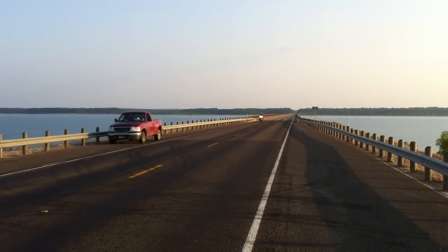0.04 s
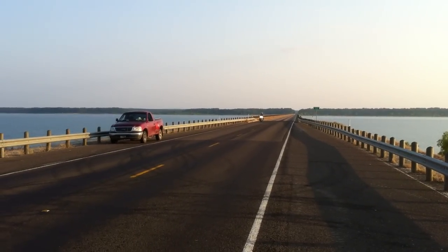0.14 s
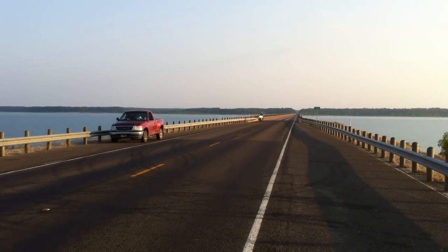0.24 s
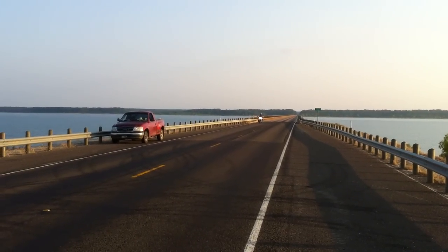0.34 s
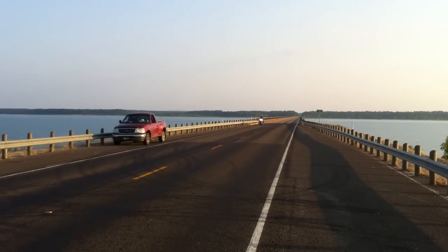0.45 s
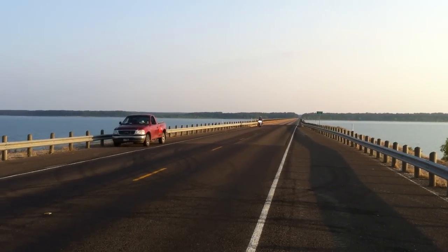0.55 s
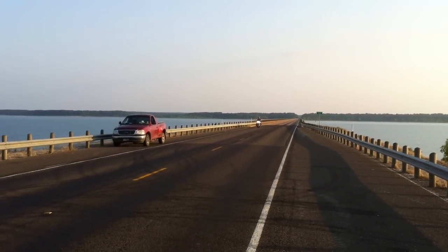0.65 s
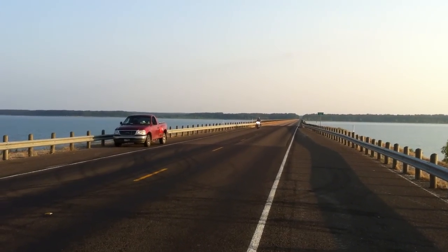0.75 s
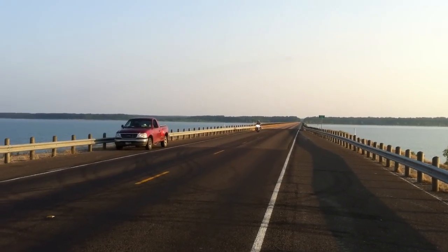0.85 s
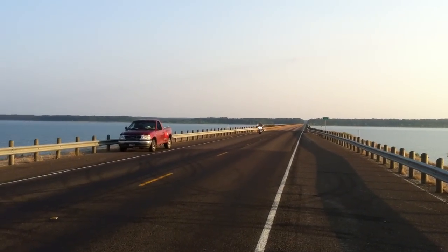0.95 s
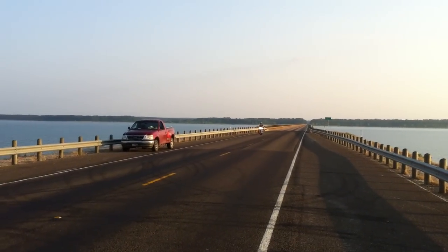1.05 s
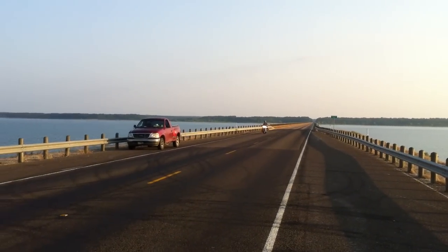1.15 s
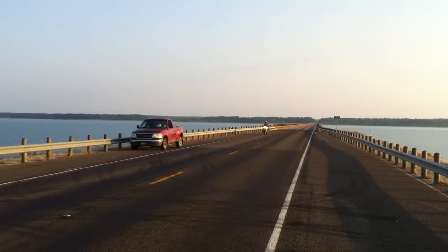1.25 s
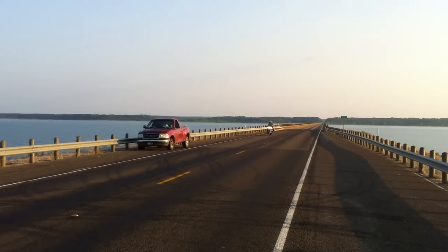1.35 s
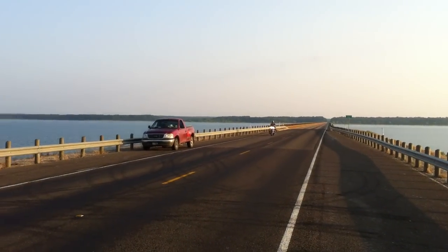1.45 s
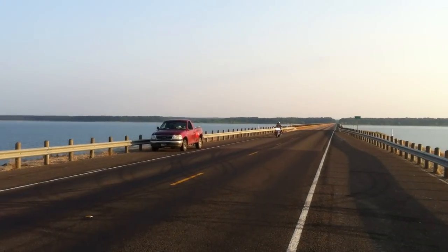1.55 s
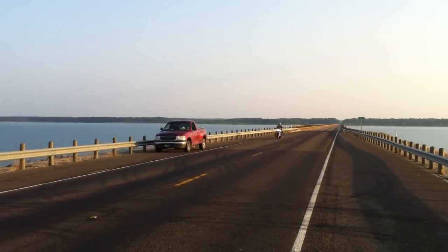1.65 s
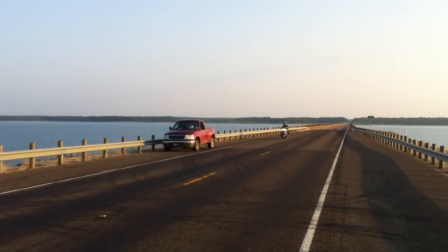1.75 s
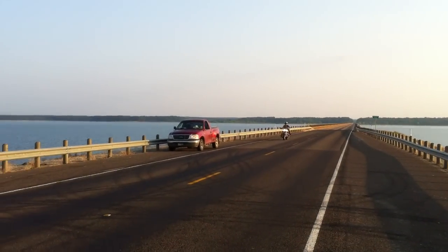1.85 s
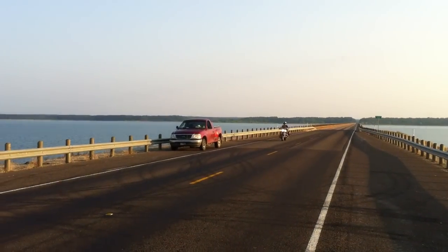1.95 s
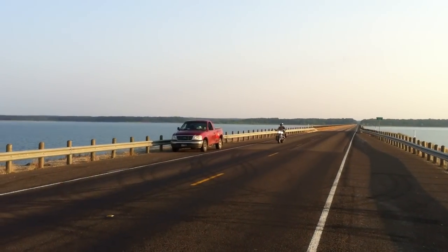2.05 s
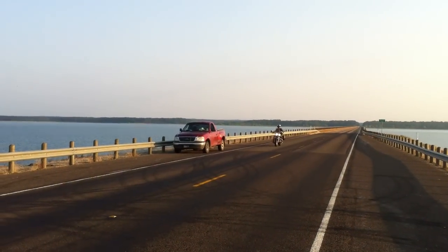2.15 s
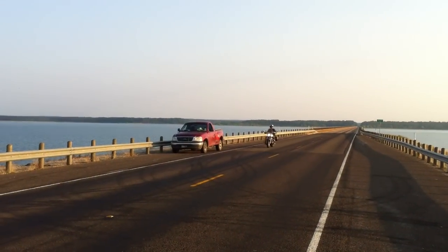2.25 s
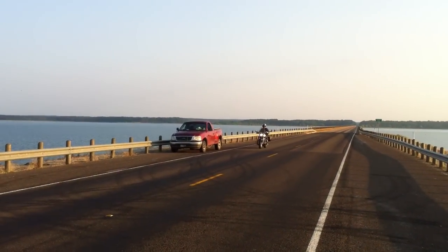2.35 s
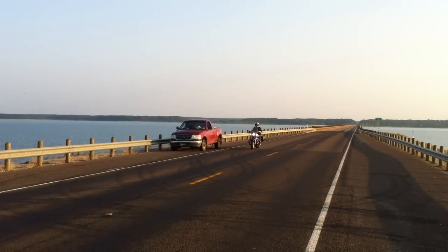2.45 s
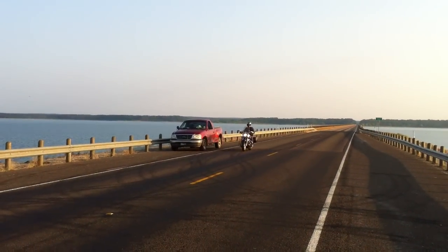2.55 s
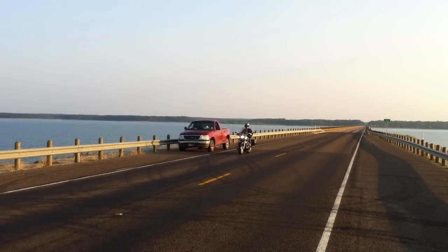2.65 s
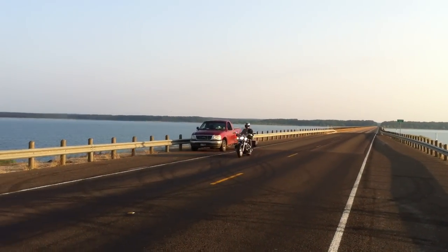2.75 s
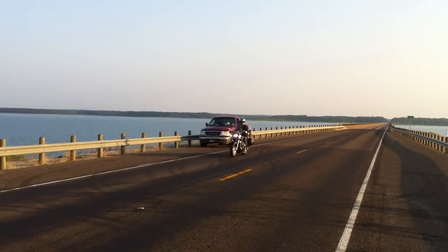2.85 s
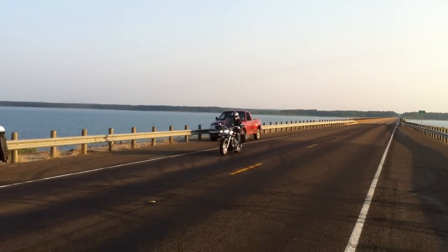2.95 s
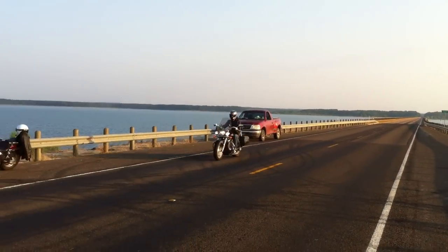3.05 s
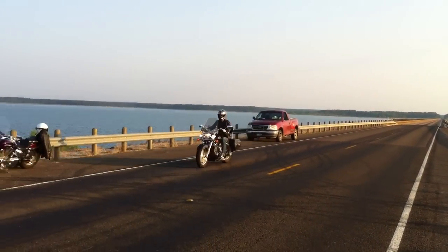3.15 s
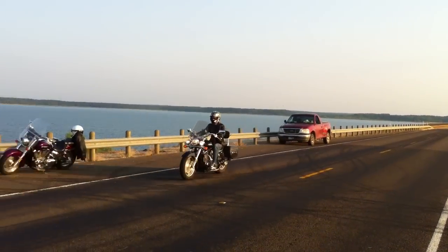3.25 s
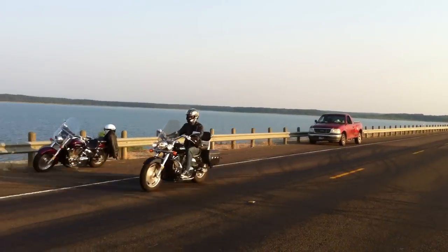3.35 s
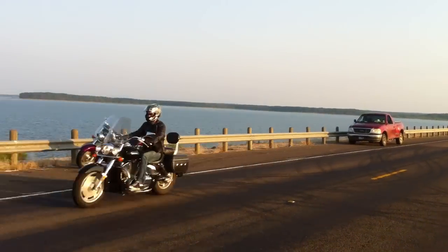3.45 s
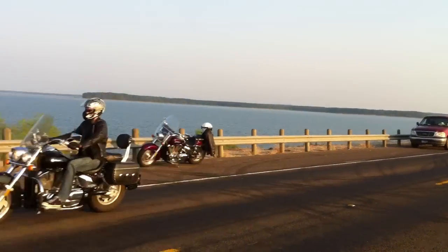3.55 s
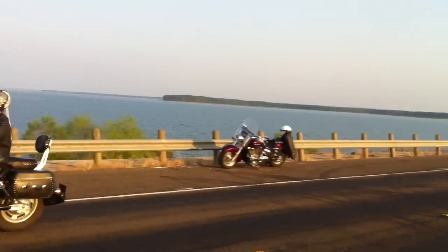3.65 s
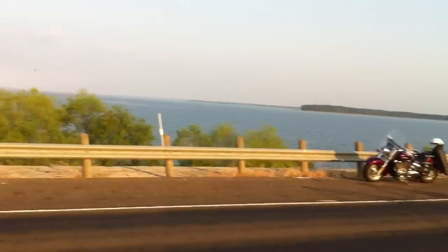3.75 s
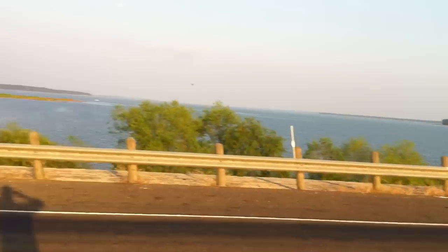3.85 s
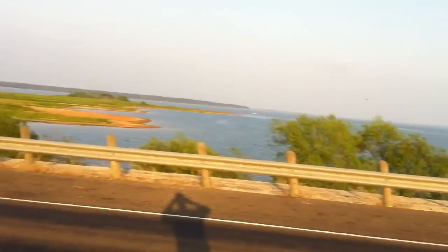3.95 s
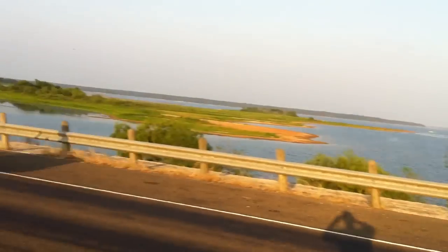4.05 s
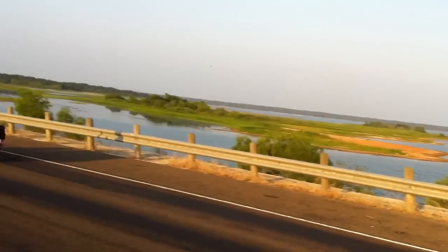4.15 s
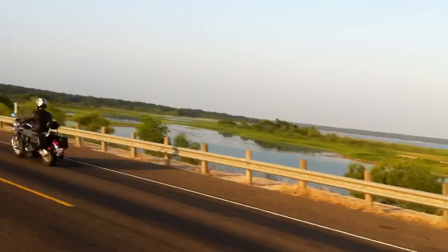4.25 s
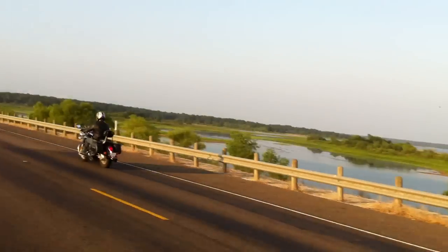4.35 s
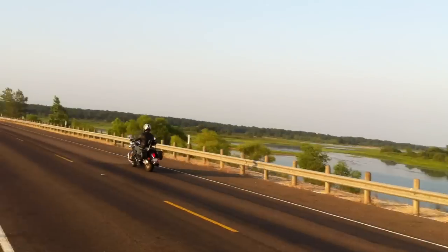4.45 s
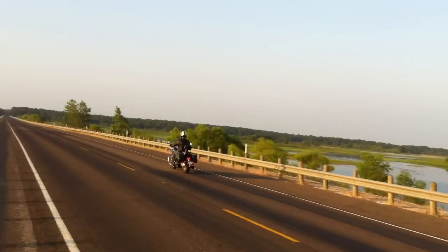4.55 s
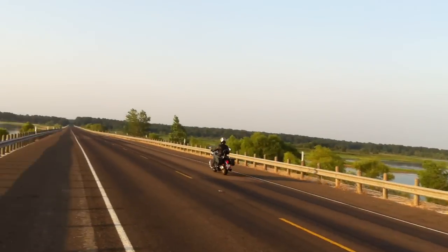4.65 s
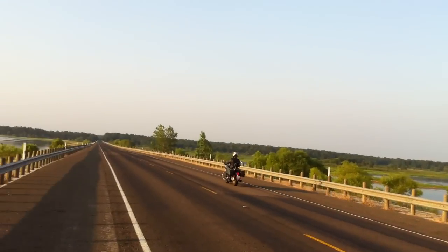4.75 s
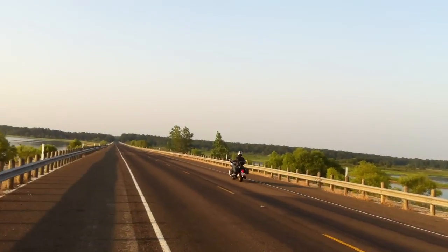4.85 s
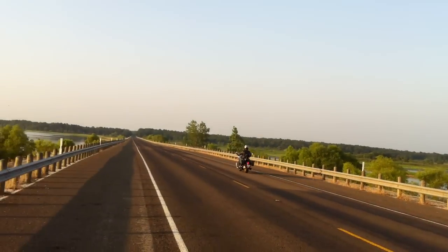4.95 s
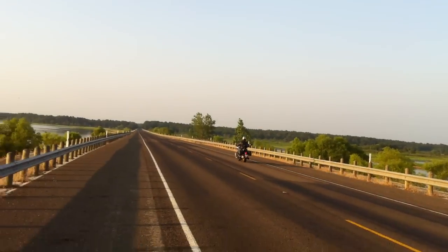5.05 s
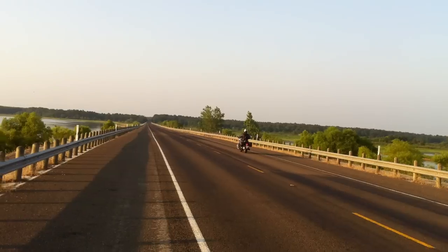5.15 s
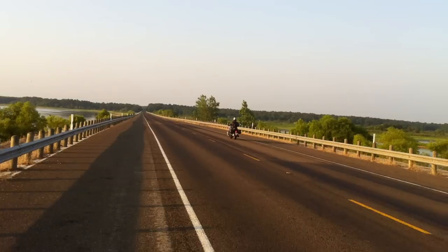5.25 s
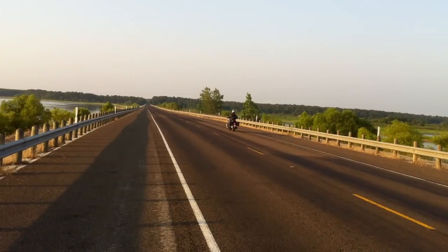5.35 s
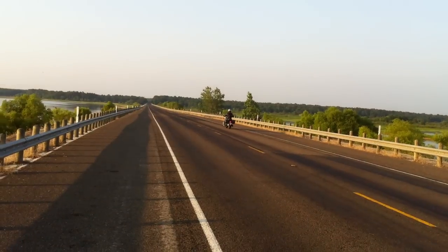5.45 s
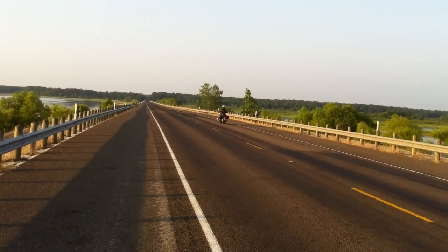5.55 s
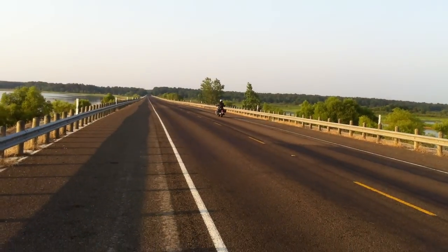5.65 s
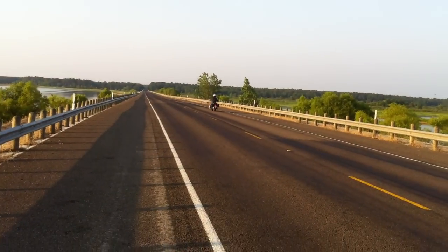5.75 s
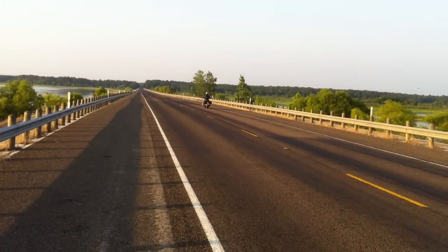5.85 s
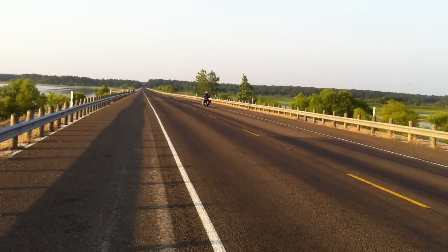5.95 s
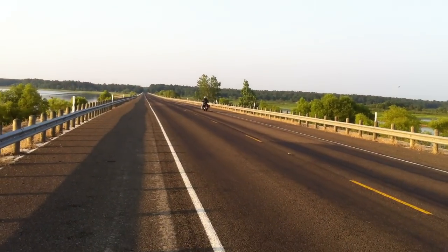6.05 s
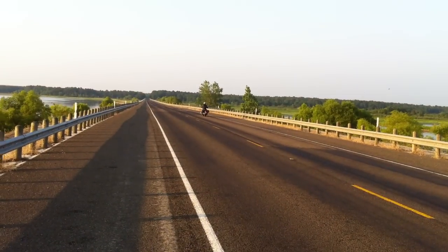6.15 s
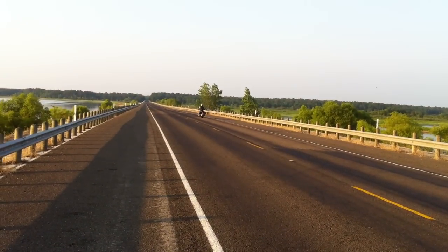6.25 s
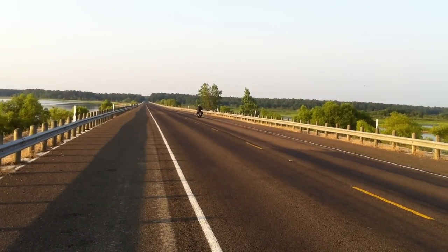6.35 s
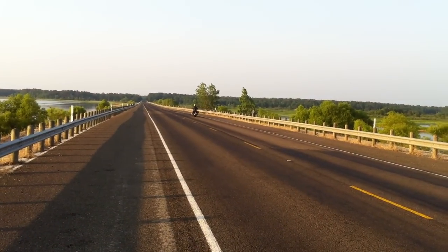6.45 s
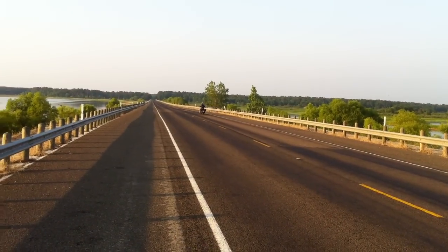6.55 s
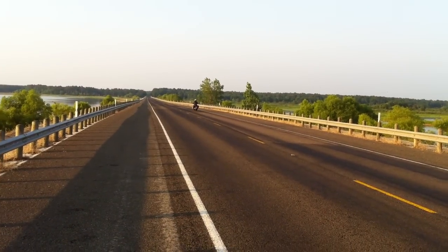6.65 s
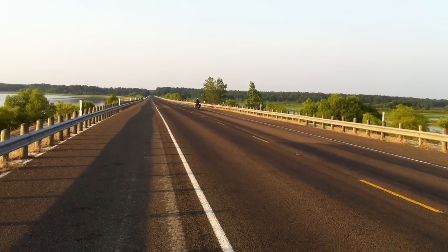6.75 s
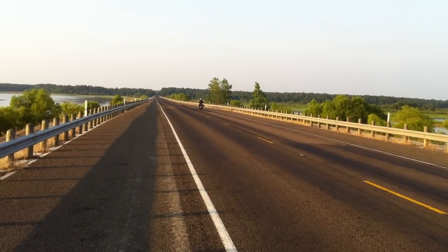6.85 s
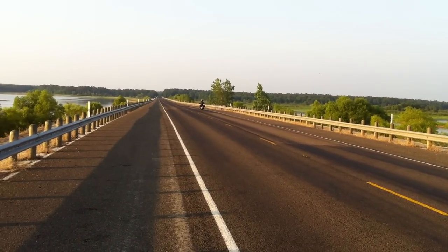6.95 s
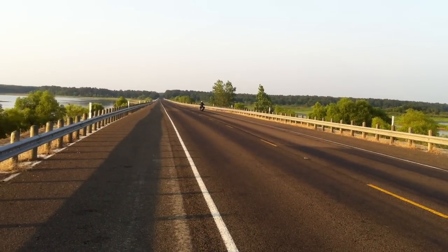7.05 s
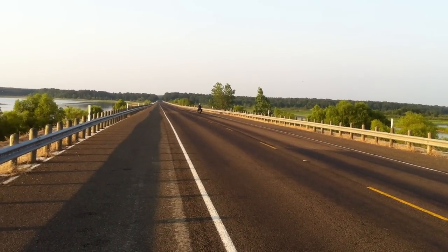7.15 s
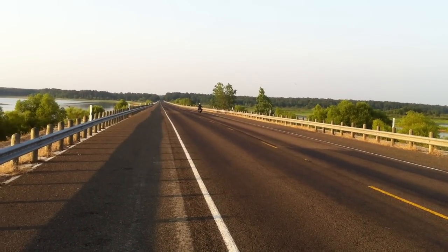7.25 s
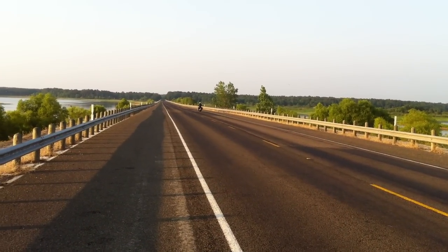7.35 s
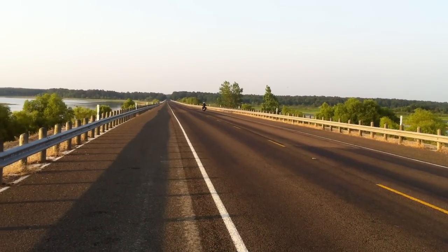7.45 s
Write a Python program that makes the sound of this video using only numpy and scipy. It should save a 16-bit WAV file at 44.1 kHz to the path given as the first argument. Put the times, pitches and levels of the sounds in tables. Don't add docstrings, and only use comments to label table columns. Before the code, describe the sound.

A motorcycle with loud open pipes approaches at steady speed, roars past the roadside, then drops in pitch and crackles away down an open causeway.

```python
import sys
import numpy as np
from scipy import signal
from scipy.fft import rfft, irfft
from scipy.io import wavfile
from scipy.ndimage import uniform_filter1d

SR = 44100
rng = np.random.default_rng(int(sys.argv[2]) if len(sys.argv) > 2 else 0)


def invert_db(x):
    u = np.asarray(x, float) / 20
    return 10 ** u


def digitize_waveform(pressure):
    field = np.atleast_2d(pressure).T
    bounded = np.clip(field, -1, 1)
    quanta = np.round(bounded * 32767).astype(np.int16)
    wavfile.write(sys.argv[1], SR, quanta)


N = 330750
TIME = np.arange(N) / SR
STEPS = 512

ABREAST_S, SPEED_MS, NEAREST_M, CYCLES_AT_ZERO = 3.9408, 24.228, 6.458, 7.139
# t/s, rate/(cycles/s)
REVS = [
    (0, 25.4814),
    (5.5, 25.6229),
    (7.5, 25.9063),
]
FIRING = (.3175, .7146)
MOUTH = (.32, .728)
# t/s, level/dB
NOTE = [(0.0, -27), (0.06, -28), (1.19, -24), (2.0, -21), (2.8, -16), (3.15, -12), (3.61, -11.5),
        (4.07, -13), (4.26, -15.5), (7.16, -20), (7.5, -20)]
NOTE_DB = 1.5

PIPE_A_MODES = [(4.51, 0.8, -1.41, 0.17), (5.11, 2.31, 0.96, 0.25), (9.28, 0.8, -0.8, -0.73),
                (10.5, 3.56, 0.76, 0.87), (13.44, 1.28, -0.48, -0.83), (16.41, 0.8, -0.06, -0.26),
                (18.38, 0.8, 0.11, -0.35), (22.61, 1.85, 0.53, -0.15), (23.58, 4.13, -0.26, -0.01),
                (31.5, 0.8, 0.02, 0.45), (31.78, 2.59, 0.01, -0.16), (34.08, 2.05, -0.05, -0.01),
                (37.53, 0.8, -0.0, -0.11)]
PIPE_B_MODES = [(5.64, 0.8, -1.65, -0.62), (6.27, 0.8, 1.33, 0.76), (7.67, 0.81, -0.78, -0.67),
                (10.91, 3.92, 0.88, 1.14), (12.4, 1.48, -0.81, -0.82), (15.77, 1.1, -0.2, -0.03),
                (18.26, 1.74, 0.06, -0.35), (23.91, 3.4, 0.1, -0.11), (25.69, 0.8, -0.49, -0.05),
                (28.84, 1.91, -0.03, -0.22), (32.21, 8.0, -0.07, 0.16), (33.22, 0.8, 0.26, -0.01),
                (38.24, 4.37, 0.02, -0.08)]
TRIMMED_MULTIPLES = (10, 16, 17, 18, 20, 21, 26, 27, 29, 30, 31, 32, 33, 34, 35, 37, 39, 41)
# front level/dB, rear level/dB
TRIM_LEVELS = [(0.5, -0.5), (-6, 0), (-3.5, 0.5), (2.5, -0.5), (2.5, 0), (1, 5.5), (2.5, 0), (3.5, 5),
               (-0.5, -1.5), (5.5, 3.5), (2.5, -11), (-7, 4.5), (-2, 3.5), (-6.5, -5), (-10, -17), (1, 9.5),
               (1, -8), (4, -9)]
SINGING_MULTIPLES = [(10, 0), (12, 1), (18, 1), (30, 1), (33, 1), (38, 1), (15, 1), (15, 0), (38, 1),
                     (37, 1), (38, 1), (36, 1), (36, 1), (32, 1), (33, 1), (25, 0), (26, 0), (30, 0),
                     (30, 0), (23, 0), (38, 0)]
# loudest t/s, spread/s, level/dB
SINGING_SWELLS = [(3.68, 0.14, -13), (4.03, .08, -6), (3.79, 0.39, -19.5), (3.97, 0.05, -19),
                  (4.3, .06, -17), (3.98, 0.095, -13.5), (4.5, 0.2, -17), (3.66, 0.26, -19),
                  (4.55, 0.17, -20), (5.46, .25, -24), (5, 0.13, -22), (6.3, 0.23, -19), (7.0, .25, -25),
                  (7.33, 0.23, -25), (7.25, .3, -26), (2.8, 0.18, -31), (3.4, 0.11, -30),
                  (2.61, 0.091, -22), (3.16, .2, -27), (3.2, 0.083, -31), (3.72, 0.037, -15)]
BARK_NEAR_DB, BARK_DB_PER_M = -7, 0.0886
CHOP_DB, CHOP_S, CHOP_SPREAD_S = 1.5, 3.24, 0.73

# f/Hz, level/(dB per Hz)
CRACK_SPECTRUM = [(650, -32), (1100, -1.5), (1570, 3), (1720, -4), (2060, -3.5), (2250, -4), (2820, -13),
                  (3770, -9), (4900, -15.5), (5650, -21.5), (6680, -11), (8170, -16), (9240, -30.5),
                  (10900, -21.5), (13500, -27.5), (16000, -28)]
CRACK_LOW_DB, CRACK_HIGH_DB, SECOND_DB, SECOND_DB_PER_M = -1, -11, -1.5, -0.1512
AIMED_S, AIM_SPREAD_S, OFF_AIM_DB = 3.84, 0.32, -40
# t/s, high peak level/dB, low level/dB, brightest f/Hz
EARLY_CRACKS = [
    (3.773, -32, -10, 2100),
    (3.811, -32, -12, 1930),
    (3.849, -18, -40, 3600),
]
# t/s, high peak level/dB, low level/dB, brightest f/Hz
LOUD_CRACKS = [(4.1228, -11, -19.5, 4450), (4.2455, -8.5, -19.5, 3920), (4.3279, -7, -18.5, 4500),
               (4.4521, -8.5, -25, 5370), (4.6606, -11, -17.5, 4050), (4.7025, -6, -19, 7560),
               (4.7858, -4, -20, 3700), (4.9524, -13.5, -19, 3780), (5.0362, -6, -24, 6700),
               (5.1615, -10.5, -18, 6350), (5.2448, -10, -23, 6410), (5.4957, -8, -19.5, 3400),
               (5.5366, -13, -20.5, 4000), (5.6204, -12.5, -21, 7800), (5.6618, -10, -19, 6980),
               (5.8709, -10, -37, 3730), (5.9133, -11, -27, 3730), (6.0794, -12, -23, 4700),
               (6.1622, -12, -25, 7960), (6.2879, -12, -26, 3500), (6.3288, -10.5, -22, 4200),
               (6.4535, -13.5, -25, 3850), (6.5368, -14.5, -24, 3940), (6.5787, -6.5, -26, 3820),
               (6.703, -11, -20, 4060), (6.7444, -10.5, -24.5, 3900), (6.7863, -10.5, -25, 3830),
               (6.8282, -10, -22, 3800), (6.8696, -8.5, -23, 3740), (7.1594, -13, -27, 3470)]
# t/s, high peak level/dB, low level/dB, brightest f/Hz
FIRM_CRACKS = [(3.9787, -21, -22, 1720), (4.0411, -11, -23, 1800), (4.0573, -20, -19, 3010),
               (4.0816, -12, -20, 1690), (4.0969, -32, -30, 1720), (4.1393, -10, -33, 3780),
               (4.1629, -13, -23.5, 1700), (4.2859, -12, -21, 4990), (4.3028, -19, -26, 1700),
               (4.3436, -11.5, -33, 4730), (4.4106, -11.5, -22, 4200), (4.4266, -13, -25, 5400),
               (4.4684, -10.5, -31, 7360), (4.4939, -10, -16.5, 8780), (4.5357, -10, -14.5, 6800),
               (4.5513, -12, -31, 4560), (4.6183, -11.5, -23, 8090), (4.6347, -14, -28, 4900),
               (4.7187, -11.5, -26, 8090), (4.8019, -13, -27, 6970), (4.9108, -13.5, -22, 3700),
               (5.0106, -14, -33, 7570), (5.3699, -12.5, -20, 6340), (5.386, -20, -37, 8010),
               (5.4122, -14, -23, 4040), (5.579, -11.5, -24, 1720), (5.679, -17, -25, 8350),
               (5.8036, -18, -29, 4730), (5.8287, -13.5, -29, 3800), (5.8452, -12, -36, 7140),
               (5.9956, -14.5, -27, 3610), (6.0957, -16, -31, 4470), (6.1786, -17.5, -37, 7660),
               (6.2039, -16, -29, 6450), (6.2455, -13, -23.5, 3500), (6.3446, -12, -39, 6700),
               (6.3709, -14, -30, 3500), (6.4698, -17, -34, 3870), (6.4957, -15, -25, 4220),
               (6.553, -19, -29, 3870), (6.8026, -23, -32, 3610), (6.9106, -14.5, -24, 3580),
               (6.9516, -12, -25, 4520), (7.0347, -14.5, -30, 3610), (7.0763, -16, -25, 7000),
               (7.118, -15.5, -30, 7400)]
# t/s, high peak level/dB, low level/dB, brightest f/Hz
SOFT_CRACKS = [(4.2043, -19, -18, 3880), (4.3695, -22, -28, 3820), (4.577, -20.5, -20, 3470),
               (4.7441, -25, -21, 3640), (4.8269, -22, -19, 3770), (4.8693, -19, -27, 3280),
               (4.9945, -17, -19, 6500), (5.0779, -18, -21, 3330), (5.1198, -20, -20.5, 4150),
               (5.2031, -25, -17.5, 3800), (5.2869, -18.5, -31, 3320), (5.3283, -18, -19.5, 3150),
               (5.4535, -24, -22.5, 3760), (5.7039, -24, -25, 3900), (5.7458, -21, -21, 3710),
               (5.7872, -23.5, -23, 4130), (5.9544, -21, -27, 3550), (6.0377, -19.5, -32, 4470),
               (6.121, -26, -28, 3580), (6.4128, -19, -22, 3530), (6.6199, -22, -26, 4020),
               (6.6613, -23, -23, 3810), (6.994, -25, -30, 3670), (7.201, -21, -29, 3520),
               (7.2419, -22, -27, 3340), (7.2838, -28, -28, 3350), (7.3257, -21, -27, 3510),
               (7.3667, -29, -29, 3590), (7.4086, -23.5, -24, 3530), (7.45, -26.5, -28, 3530)]
SOFT_HIGH_DB = 3.5
LOUD_HIGH_DB, LOUD_LOW_DB, BRIGHT_DB, BRIGHT_OCTAVES = -8, -0.5, 8.5, 0.29
TOP_PATCHY = 0.89
SHOCK_DB, SHOCK_HZ, SHOCK_S, SHOCK_LAG_S = 3.5, 1590, 0.00036, 0.00165

# f/Hz, level/(dB per Hz)
ROAR_FRONT = [(260, 9), (360, -1), (450, -3.5), (498, -12.5), (540, -5.5), (610, -3.5), (696, 0.5),
              (777, 0), (929, -2), (1170, -14.5), (1400, -4), (1520, -11), (1650, -9), (1870, -20),
              (2240, -13), (2900, -31), (3770, -58), (6380, -120)]
# f/Hz, level/(dB per Hz)
ROAR_BEHIND = [(260, 0), (450, -2), (483, -8), (543, -2.5), (644, -6.5), (718, -1.5), (880, 4.5),
               (1080, -8), (1240, -5), (1600, -11.5), (2200, -19), (2900, -30.5), (3770, -25.5),
               (6380, -120)]
# f/Hz, level/(dB per Hz)
HISS_FRONT = [(1710, -35), (2750, -4.5), (3080, -6.5), (3540, -2), (4100, -11), (5440, -17), (6690, -11.5),
              (7400, -18), (8200, -23), (9200, -20), (10600, -23.5), (11700, -35.5), (15100, -27),
              (16000, -36)]
# f/Hz, level/(dB per Hz)
HISS_BEHIND = [(1710, -43), (2900, -7), (3210, -8), (3780, -8.5), (5000, -10.5), (5700, -13), (6500, -12),
               (8290, -10), (9400, -25), (10600, -23), (13500, -40), (16000, -37)]
# level at 0 dB note/dB, slope/(dB per dB)
ROAR_LAW, HISS_LAW = [(-15, 1.041), (-7, 1.255)], [(-23.5, 1.644), (-27, 1.22)]
DEEP_FRONT_DB, DEEP_BEHIND_DB, DEEP_DB_PER_M = -2, -7, 0.0735
DEEP_SIDE_DB, DEEP_SIDE_S, DEEP_SIDE_SPREAD_S = -4.5, 3.83, 0.14
RASP_DB, RASP_DB_PER_M = 2.5, -0.0825
TREBLE_TURNS_S = 4.3
HISS_TOP_DYING_DB, HISS_TOP_EXTRA_DB = 30, 22
HISS_TOP_EDGES_HZ = (4900, 6500, 8500, 11000, 16000)

# f/Hz, width/Hz, level/dB
VALVE_RINGS = [(1392, 130, -6.5), (1745, 110, -0.5), (2180, 89, 0), (3500, 200, -5.5), (4730, 360, -21)]
VALVE_DB, VALVE_SCATTER_DB = 0.5, 4

# extra path times distance/m^2, level/dB
RAIL_ECHOES = [
    (58, -16),
    (105, -15),
]
RAIL_TOP_HZ, SCATTER_TOP_HZ = 6800, 5000

# f/Hz, level/(dB per Hz)
WIND_SPECTRUM = [(15, -9), (40, -1), (60, 1), (85, -3), (115, -19), (300, -40)]
CALM_DB, FACING_WIND_DB, TURN_S, TURN_SPREAD_S = -71, -59, 3.1, 0.5
WAKE_S, WAKE_SPREAD_S, WAKE_DB = 4.3, 0.46, 5
# t/s, peak level/dB, length/s
BUMPS = [(0.754, -45, 0.028), (1.07, -41, 0.028), (1.215, -51, 0.028), (1.494, -43, 0.026),
         (2.094, -41, 0.028), (2.25, -51, 0.028), (3.299, -48, 0.028), (3.468, -51, 0.028),
         (3.67, -47, 0.028), (3.74, -41, 0.028), (3.787, -46, 0.028)]
# f/Hz, level/(dB per Hz)
MIC_NOISE_SPECTRUM = [(200, -26), (4000, -9), (16500, -1)]


def travel():
    sent_s = np.arange(-SR, N) / SR
    turns = np.cumsum(np.interp(sent_s, *np.transpose(REVS))) / SR
    metres = np.hypot(SPEED_MS * (sent_s - ABREAST_S), NEAREST_M)
    heard_s = sent_s + (metres - NEAREST_M) / 343
    cycle = np.interp(TIME, heard_s, turns - turns[SR] + CYCLES_AT_ZERO)
    return cycle, np.interp(TIME, heard_s, metres)


def smooth_step(at_s, spread_s):
    return 1 / (1 + np.exp(-(TIME - at_s) / spread_s))


def bump(at_s, spread_s):
    return np.exp(-((TIME - at_s) / spread_s) ** 2)


def side_on(share, before_s=.4, after_s=.4):
    late_s = TIME - ABREAST_S - .1
    return share / (1 + (late_s / np.where(late_s < 0, before_s, after_s)) ** 2) ** 2


def lowpass(order, hz):
    return signal.butter(order, hz, fs=SR, output="sos")


def shaped(points, lift=0.):
    hz, db = np.transpose(points)
    bins_hz = np.arange(N // 2 + 1) * SR / N + 1
    gain = invert_db(np.interp(np.log(bins_hz), np.log(hz), db, -99, -99))
    x = irfft(rfft(rng.standard_normal(N)) * gain, 2 * N)
    place = np.cumsum(2 + 2 * lift + 0 * TIME) % (2 * N - 1)
    x = np.interp(place, np.arange(2 * N), x)
    return x / x.std()


def walk(rate_hz):
    k = int(SR / rate_hz)
    held = np.repeat(rng.standard_normal(N // k + 1), k)
    return 1.38 * uniform_filter1d(uniform_filter1d(held, k), k)[:N]


def pipes(cycle, behind, metres, scatter_db=.45, jitter=.0008, flow=.0045):
    count = int(cycle[-1]) + 2
    multiple = np.arange(count * STEPS // 2 + 1) / count
    front, rear = 0, 0
    for firing, modes in zip(FIRING, (PIPE_A_MODES, PIPE_B_MODES)):
        chance = rng.standard_normal((count, 2))
        push = flow * np.sqrt(STEPS) * rng.standard_normal(count * STEPS)
        slot, part = np.divmod((np.arange(count) + firing + jitter * chance[:, 0]) * STEPS, 1)
        slot = slot.astype(int)
        size = 0.18 * STEPS * invert_db(scatter_db * chance[:, 1])
        push[slot] += size * (1 - part)
        push[slot + 1] += size * part
        push = rfft(push) * invert_db(7.5 / (1 + (29 / (multiple + 1)) ** 18))
        for centre, width, ahead, astern in modes:
            ring = push * centre * width / (centre ** 2 - multiple ** 2 + 1j * multiple * width)
            front = front + ahead * ring
            rear = rear + astern * ring
    for order, (front_db, rear_db) in zip(TRIMMED_MULTIPLES, TRIM_LEVELS):
        near = np.exp(-((multiple - order) / .4) ** 2)
        front = front * invert_db(front_db * near)
        rear = rear * invert_db(rear_db * near)
    rear = rear / (1 + (multiple / 45) ** 10)
    bark = rear / (1 + ((multiple - 32) / 4.5) ** 8)

    fine = count * STEPS * 3
    heard = [np.interp(cycle * STEPS * 3, np.arange(fine), 3 * irfft(v, fine)) for v in (front, rear, bark)]
    bark_gain = invert_db(BARK_NEAR_DB + BARK_DB_PER_M * metres) - 1
    note = (1 - behind) * heard[0] + behind * (heard[1] + bark_gain * heard[2])

    upper = signal.sosfiltfilt(signal.butter(3, 520, "high", fs=SR, output="sos"), note)
    waver = walk(4.96)
    flutter = waver[np.arange(N) * 5 % N]
    beam_db = 1.2 * waver - 9 * bump(ABREAST_S - .4, .45)
    beam_db = beam_db + CHOP_DB * flutter * bump(CHOP_S, CHOP_SPREAD_S)
    note = note + (invert_db(beam_db) - 1) * upper

    for (order, end), (at_s, spread_s, db) in zip(SINGING_MULTIPLES, SINGING_SWELLS):
        phase = np.angle((front, rear)[end][order * count])
        swell = invert_db(db + 3.3 * np.roll(waver, order * 997)) * bump(at_s, spread_s)
        note = note + swell * np.cos(2 * np.pi * order * cycle + phase)
    return note


def cracks(cycle, metres, note_db, rise_s=.0005, fall_s=0.00086, scatter_db=-0.8, colour_db=7, air_db=-0.1179):
    hz, db = np.transpose(CRACK_SPECTRUM)
    edges_hz, out = np.geomspace(1100, 16000, num=11), 0
    since = [cycle - mouth for mouth in MOUTH]
    index = [np.floor(s).astype(int) + 1 for s in since]
    ages_s = [s % 1 / (np.gradient(cycle) * SR) for s in since]
    bursts = [(a / rise_s) ** 1.553 * np.exp(-a / fall_s) for a in ages_s]
    chance = rng.standard_normal((index[0][-1] + 1, 2, len(edges_hz)))
    aim_db = note_db + OFF_AIM_DB * (1 - smooth_step(AIMED_S, AIM_SPREAD_S))
    soft = [(s, high_db + SOFT_HIGH_DB, low_db, f) for s, high_db, low_db, f in SOFT_CRACKS]
    listed = list(EARLY_CRACKS) + list(LOUD_CRACKS) + list(FIRM_CRACKS) + soft
    late_s = ages_s[0] - SHOCK_LAG_S
    shock = np.exp(-(late_s / SHOCK_S) ** 2) * np.sin(2 * np.pi * SHOCK_HZ * late_s)
    for k in range(len(edges_hz) - 1):
        at_hz = np.geomspace(edges_hz[k], edges_hz[k + 1], num=12)
        level_db = np.interp(np.log(at_hz), np.log(hz), db)
        band_rms = np.sqrt(np.mean(invert_db(2 * level_db)) * (at_hz[-1] - at_hz[0]) / 400)
        band = shaped(np.c_[at_hz, level_db], side_on(.2)) * band_rms
        colour = uniform_filter1d(chance[:, :, k], size=2, axis=0) * colour_db
        patch_db = colour + scatter_db * chance[:, :, -1]
        high = k > 3
        first_db = aim_db + (CRACK_HIGH_DB if high else CRACK_LOW_DB - 9.0)
        first_db = first_db + (.75 if high else .45) * patch_db[index[0], 0]
        second_db = aim_db + SECOND_DB + SECOND_DB_PER_M * metres - (0 if high else 8)
        second_db = second_db + 0.19 * patch_db[index[1], 1]
        dbs = [first_db, second_db]
        for s, high_db, low_db, bright_hz in listed:
            i = int((s + .003) * SR)
            pipe = int(ages_s[1][i] < ages_s[0][i])
            turn = index[pipe][i]
            lift_db = BRIGHT_DB * np.exp(-(np.log2(at_hz[6] / bright_hz) / BRIGHT_OCTAVES) ** 2)
            loud_db = high_db + LOUD_HIGH_DB if high else low_db + LOUD_LOW_DB
            chance_db = (TOP_PATCHY if k > 6 else 0.25) * patch_db[turn, pipe]
            first, last = np.searchsorted(index[pipe], [turn, turn + 1])
            dbs[pipe][first:last] = loud_db + lift_db + chance_db
        gain = invert_db(dbs[0]) * bursts[0] + invert_db(dbs[1]) * bursts[1]
        out = out + invert_db(-4.5 + air_db * metres * (at_hz[0] / 10000) ** 2) * gain * band
        if k == 1:
            out = out + invert_db(dbs[0] + SHOCK_DB) * shock
    return out


def roar(cycle, behind, roar_db, hiss_db, deep_db, rasp_db):
    since = np.minimum(*[(cycle - mouth - .03) % 1 for mouth in MOUTH])
    dying_db = uniform_filter1d(-behind * since, size=60)
    low = np.sqrt(1 - behind) * shaped(ROAR_FRONT, side_on(.11, before_s=.85))
    low = low + np.sqrt(behind) * invert_db(-4.5) * shaped(ROAR_BEHIND)
    aimed = smooth_step(TREBLE_TURNS_S, .08)
    high = np.sqrt(1 - aimed) * shaped(HISS_FRONT, side_on(.25, before_s=.5))
    high = high + np.sqrt(aimed) * shaped(HISS_BEHIND, side_on(.25))
    deep = signal.sosfiltfilt(lowpass(4, 1080), low)
    puff_db = (1 - behind) * (0.79 * walk(45) - 6 * (uniform_filter1d(since, size=60) - .25))
    puff_db = puff_db + behind * (rasp_db + 1.96 * walk(60))
    low = invert_db(puff_db) * (low - deep) + invert_db(deep_db) * deep
    patches = 0
    for edges_hz in zip(HISS_TOP_EDGES_HZ, HISS_TOP_EDGES_HZ[1:]):
        top = signal.sosfiltfilt(signal.butter(4, edges_hz, "band", fs=SR, output="sos"), high)
        patch_db = (HISS_TOP_DYING_DB + HISS_TOP_EXTRA_DB) * dying_db + 6.4 * walk(70) + 3.0
        patches = patches + (invert_db(patch_db * aimed) - 1) * top
    high = high + patches
    swell = 1 + 0.051 * np.cos(2 * np.pi * (cycle - .4))
    low = invert_db(roar_db + 5.5 + 0.47 * walk(9) + 1.2 * dying_db) * low
    high = invert_db(hiss_db + 2.5 + 1.0 * walk(13) + 30 * dying_db * aimed) * high
    return swell * (low + high)


def valves(cycle, behind, hiss_db):
    beat = np.flatnonzero(sum(np.diff(np.floor(cycle - firing)) for firing in FIRING))
    chance, out = rng.standard_normal((len(beat), len(VALVE_RINGS))), 0
    for k, (hz, width_hz, db) in enumerate(VALVE_RINGS):
        tick = np.zeros(N)
        tick[beat] = invert_db(VALVE_SCATTER_DB * np.clip(chance[:, k], -2, 1.6))
        ring = signal.lfilter(*signal.iirpeak(hz, hz / width_hz / 3, fs=SR), tick)
        ring = signal.lfilter(*signal.iirpeak(hz, hz / width_hz, fs=SR), ring)
        out = out + invert_db(db) * ring / ring.std()
    return (1 - behind) * invert_db(hiss_db + VALVE_DB) * out


def roadside(x, metres, t60_s=0.28, tail_db=-11.5):
    echoes = sum(invert_db(db) * np.interp(TIME - extra / metres / 343, TIME, x) for extra, db in RAIL_ECHOES)
    echoes = signal.sosfilt(lowpass(2, RAIL_TOP_HZ), echoes)
    age_s = np.arange(SR // 8) / SR
    tail = rng.standard_normal(len(age_s)) * invert_db(-60 * age_s / t60_s)
    scatter = invert_db(tail_db) * signal.fftconvolve(x, tail / np.linalg.norm(tail))[:N]
    return x + echoes + signal.sosfilt(lowpass(12, SCATTER_TOP_HZ), scatter)


def wind():
    gust_db = CALM_DB + (FACING_WIND_DB - CALM_DB) * smooth_step(TURN_S, TURN_SPREAD_S)
    gust_db = gust_db + WAKE_DB * bump(WAKE_S, WAKE_SPREAD_S)
    out = invert_db(gust_db + 2.5 * np.clip(walk(14), -2, 1.4)) * shaped(WIND_SPECTRUM)
    for s, db, length_s in BUMPS:
        age = np.arange(int(4 * length_s * SR)) / SR / length_s
        thump = age ** 2 * np.exp(-3 * age) * np.sin(2 * np.pi * 84 * length_s * age)
        out[int(s * SR):][:len(age)] += invert_db(db + 24) * thump
    return out


def scene():
    cycle, metres = travel()
    behind = smooth_step(ABREAST_S, .13)
    note_db = np.interp(TIME, *np.transpose(NOTE)) + NOTE_DB
    roar_db, hiss_db = [(1 - behind) * (a + b * note_db) + behind * (c + d * note_db)
                        for (a, b), (c, d) in (ROAR_LAW, HISS_LAW)]
    deep_db = (1 - behind) * DEEP_FRONT_DB + behind * (DEEP_BEHIND_DB + DEEP_DB_PER_M * metres)
    deep_db = deep_db + DEEP_SIDE_DB * bump(DEEP_SIDE_S, DEEP_SIDE_SPREAD_S)
    rasp_db = RASP_DB + RASP_DB_PER_M * metres
    bike = invert_db(note_db) * pipes(cycle, behind, metres)
    bike = bike + roadside(behind * cracks(cycle, metres, note_db), metres)
    bike = bike + roar(cycle, behind, roar_db, hiss_db, deep_db, rasp_db)
    bike = bike + valves(cycle, behind, hiss_db)
    bass_cut = signal.butter(8, 120, "high", fs=SR, output="sos")
    return (signal.sosfilt(bass_cut, bike) + wind())[None]


def top_cut(x):
    return signal.sosfilt(signal.butter(12, 16640, fs=SR, output="sos"), x)


def record(dry):
    duck = np.minimum(1, .03 / np.sqrt(uniform_filter1d(dry ** 2, size=SR // 2) + 1e-9))
    x = dry + invert_db(-62.5) * duck ** 2 * shaped(MIC_NOISE_SPECTRUM)
    x = x / (1 + (x / .7) ** 8) ** (1 / 8)
    x = signal.sosfilt(signal.ellip(8, .3, 60, 15700, fs=SR, output="sos"), x)
    return top_cut(x)


dry = scene()
out = record(dry)
digitize_waveform(out)
```